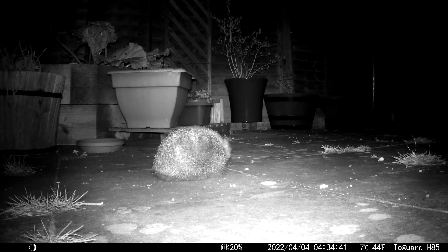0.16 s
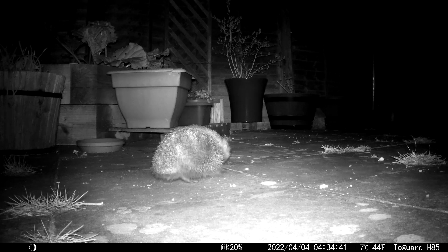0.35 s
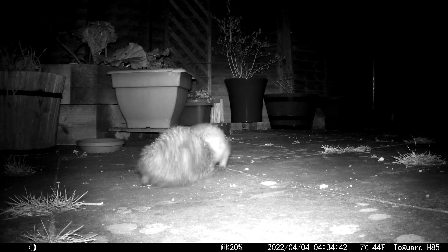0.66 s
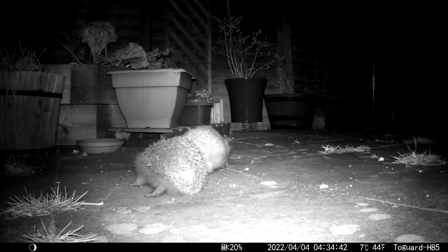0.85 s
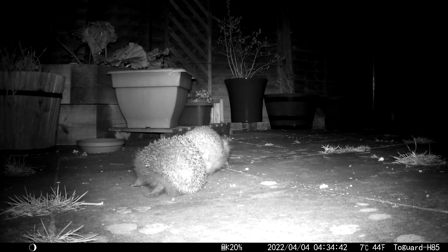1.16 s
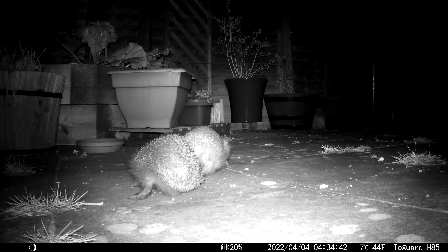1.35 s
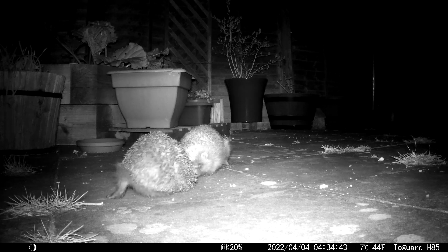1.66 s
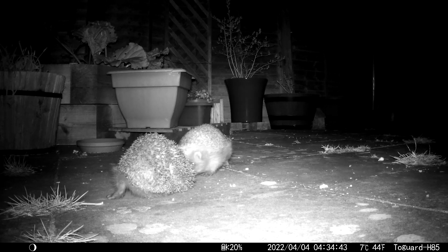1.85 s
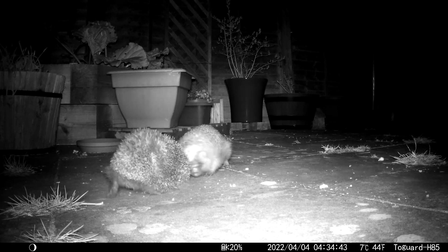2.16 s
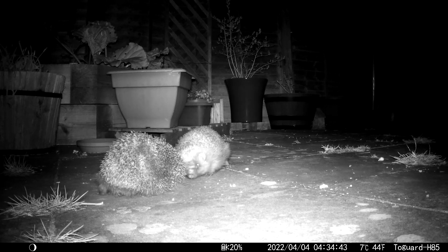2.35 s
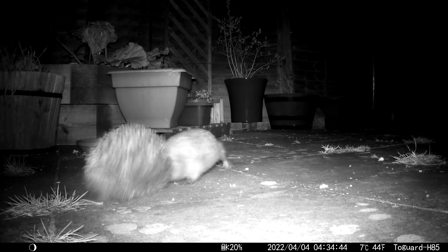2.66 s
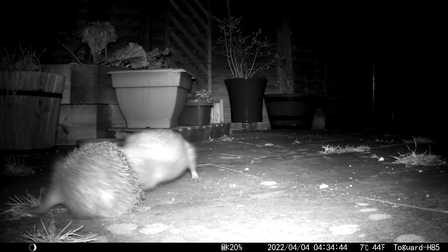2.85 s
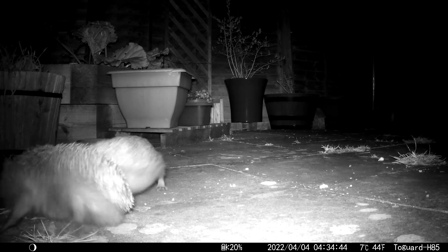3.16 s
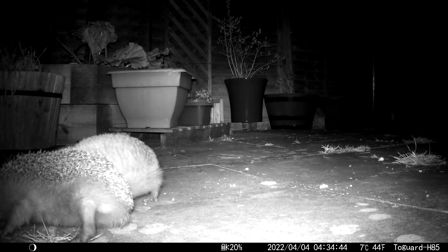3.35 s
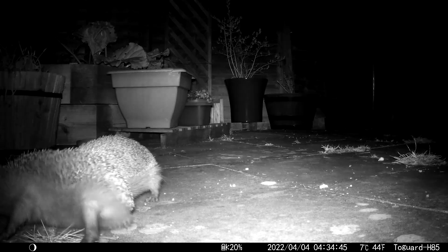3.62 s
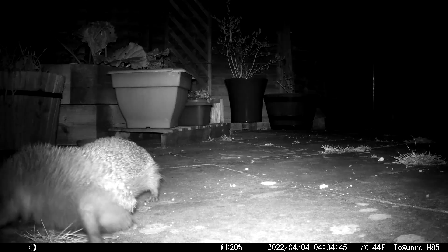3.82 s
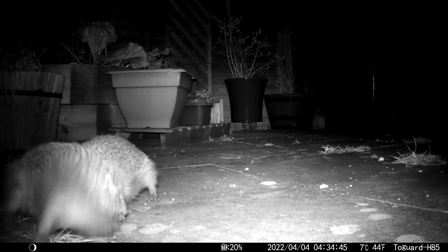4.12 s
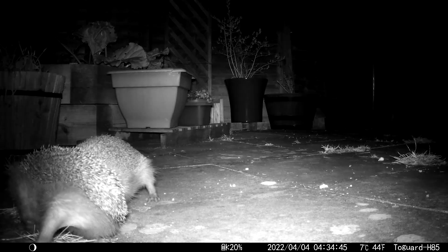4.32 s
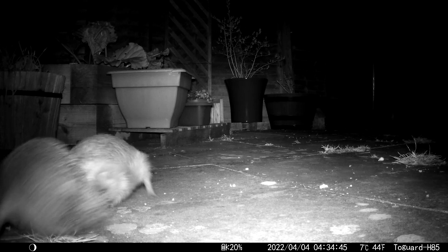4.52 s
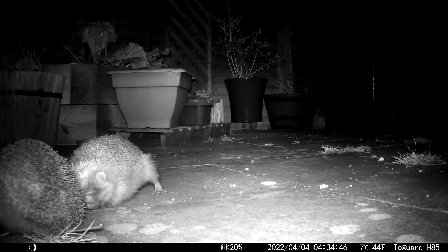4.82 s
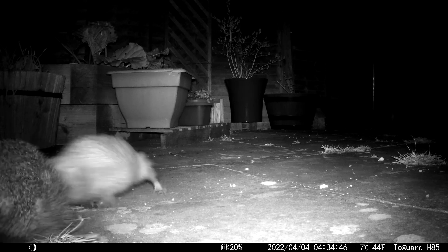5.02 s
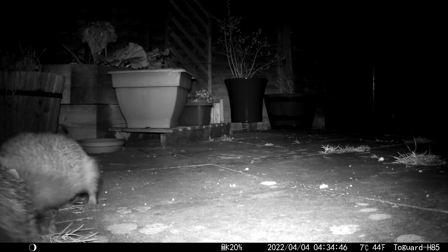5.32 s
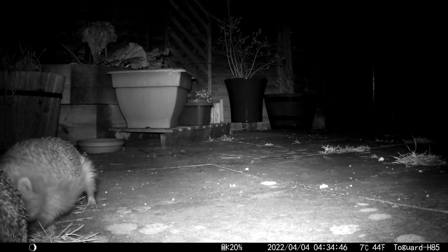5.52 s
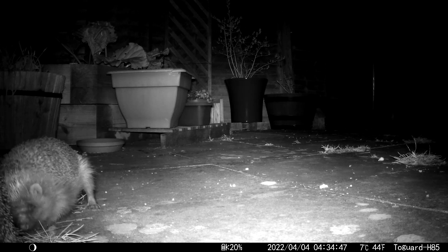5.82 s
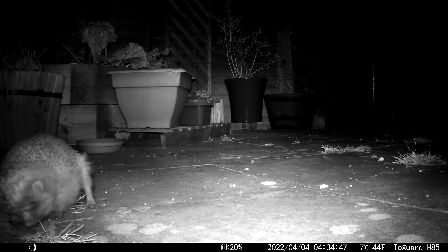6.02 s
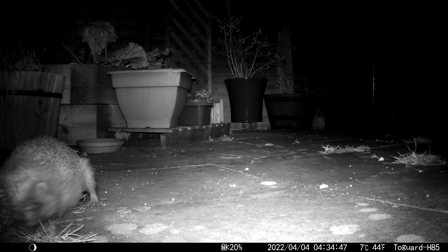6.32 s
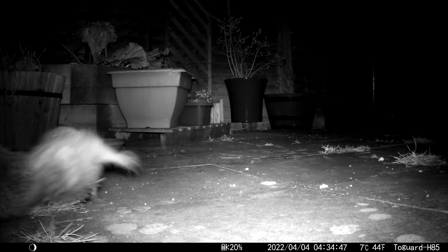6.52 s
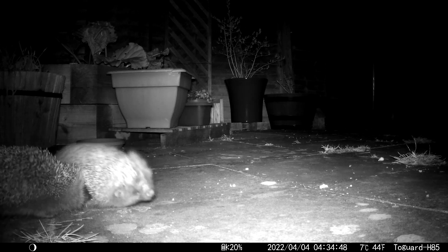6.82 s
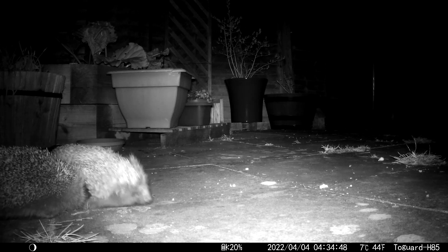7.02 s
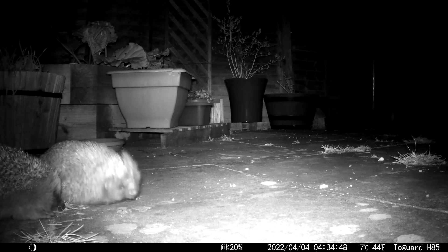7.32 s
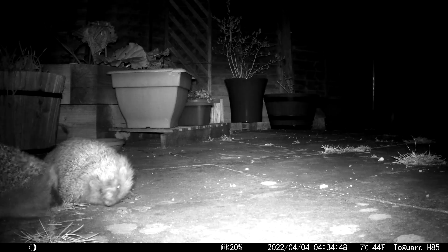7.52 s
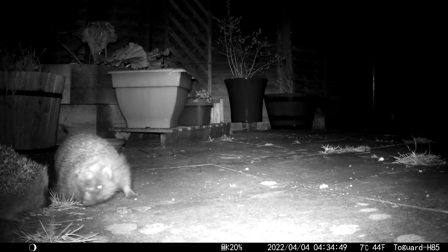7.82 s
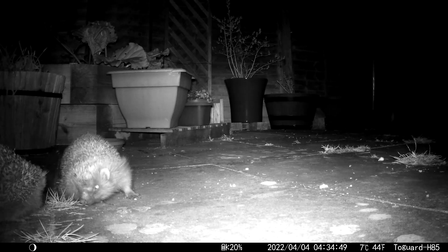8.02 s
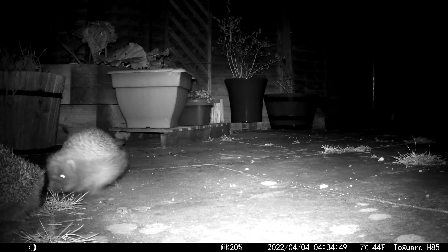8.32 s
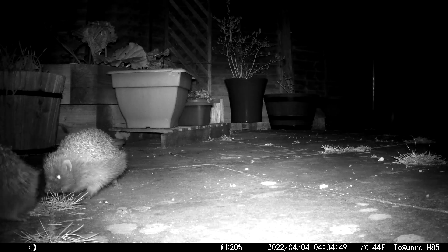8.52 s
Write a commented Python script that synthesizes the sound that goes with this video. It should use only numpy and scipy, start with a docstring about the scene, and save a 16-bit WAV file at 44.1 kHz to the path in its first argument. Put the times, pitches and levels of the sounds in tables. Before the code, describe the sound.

Sharp, breathy hedgehog snorts repeat close by, with spines scraping and claws ticking on paving above a faint wavering hum.

```python
"""Two hedgehogs snort and scuffle on a paved patio at night, close to a small outdoor microphone.
Turbulent breath rings in the nose; spines and feet scrape the stone; claws tick, with a few dull knocks.
Air buffets the microphone in lumps and short puffs.
Behind them: a wavering hum, far rumble and the recorder's hiss."""
import sys
import numpy as np
from scipy import signal
from scipy.fft import rfft, irfft, next_fast_len
from scipy.io import wavfile

SR = 44100
rng = np.random.default_rng(int(sys.argv[2]) if len(sys.argv) > 2 else 0)


def store_pcm(level_fs):
    """Save levels as 16-bit WAV."""
    pcm = np.round(np.clip(level_fs, -1, 1) * 32767).astype(np.int16)
    wavfile.write(sys.argv[1], SR, np.atleast_2d(pcm).T)


N = 382347


def from_db(db):
    """Decibels to gain."""
    return 10 ** (np.asarray(db) / 20)


def rms_one(x):
    """Scale to unit rms."""
    return x / np.sqrt(np.mean(x ** 2) + 1e-20)


def in_time(rows):
    """Interpolate (t/s, value) rows to one value a sample."""
    return np.interp(np.arange(N) / SR, *np.transpose(rows))


def after(start_s, span_s):
    """Sample indices of a span, and their age in s."""
    at = np.arange(max(int(start_s * SR), 0), min(int((start_s + span_s) * SR), N))
    return at, at / SR - start_s


def drift(rate_hz):
    """Low-passed random wander, rms 1."""
    r = np.exp(-2 * np.pi * rate_hz / SR)
    return rms_one(signal.lfilter([1], [1, -2 * r, r * r], rng.standard_normal(N + SR))[SR:])


def resonate(x, modes):
    """Parallel resonances of alternating sign, each applied twice for deep valleys."""
    out = 0
    for k, (hz, width_hz, level_db) in enumerate(modes):
        r = np.exp(-np.pi * width_hz / SR)
        b = (1 - r * r) / 2 * np.array([1, 0, -1])
        a = [1, -2 * r * np.cos(2 * np.pi * hz / SR), r * r]
        out = out + (-1) ** k * from_db(level_db) * signal.lfilter(b, a, signal.lfilter(b, a, x))
    return out


def colour(x, spectrum):
    """Shape noise by (f/Hz, gain/dB) rows; rms 1."""
    hz, gain_db = np.transpose(spectrum)
    size = next_fast_len(N)
    log_hz = np.log(np.arange(size // 2 + 1) * SR / size + 1e-3)
    gain = from_db(np.interp(log_hz, np.log(hz), gain_db))
    return rms_one(irfft(rfft(x, size) * gain, size)[:N])


def bursts(rows, t60_s, size=6000):
    """One decaying band of noise per (t/s, peak/dB, f/Hz) contact."""
    out, age_s = np.zeros(N + size), np.arange(size) / SR
    for start_s, peak_db, hz in rows:
        noise = rng.standard_normal(size) * from_db(-60 * age_s / t60_s)
        burst = resonate(noise, [(hz, 0.95 * hz, 0)])
        first = int(start_s * SR)
        out[first:first + size] += from_db(peak_db) * burst / np.abs(burst).max()
    return out[:N]


def snorts(air_top_hz=13100, roundness=1.4, tail_t60_s=0.37, whistle_width_hz=800, glide=0.04):
    """Turbulent air, fluttering as wet nostrils flap, rings in the nose; flow swells, drops, trails off."""
    # Snorts, coloured by snout direction: t/s, rise/s, fall/s, level/dB, relative tail/dB, whistle/Hz,
    # then gain/dB of whistle, upper whistle, throat, palate, nostril, top hiss
    breaths = [(-0.006, 0.0085, 0.11, -42, -3, 5200, 9, -3, 7.5, 8, 0.5, -8),
               (0.359, 0.065, 0.053, -47, -5, 4860, 1, -1, -1, 6, -2, -4),
               (0.611, 0.062, 0.054, -44.3, -6.5, 4450, -1, -8, 2.5, -7, -7.5, 3),
               (1.274, 0.049, 0.06, -34.5, -17, 4700, 2.5, -10, 2, -1.5, 1, 5),
               (1.555, 0.064, 0.078, -38, -7, 4630, -5, -8, 0, 0, -5.5, 0),
               (2.018, 0.05, 0.053, -40, -6, 4740, 1, -3, 2, -0.5, -6.5, -4),
               (2.261, 0.059, 0.055, -44.5, -30, 5560, 4, -4, 3.5, 2, -3, -5),
               (2.571, 0.058, 0.068, -34, -1.5, 5070, 3, -10, -0.5, -3.5, -7.5, 0),
               (2.816, 0.129, 0.033, -34, -7, 6200, 8, -6, -3, -3.5, 2.5, 2),
               (3.266, 0.094, 0.022, -31.5, -17.5, 6201, 0, -11, 2, -2, 3.5, 14.5),
               (3.564, 0.086, 0.067, -25, -17, 5740, -3, -8, 0, -1, -1, 2),
               (3.834, 0.058, 0.066, -32.5, -2, 4470, -2.5, -13, 2, -1, -2.5, 1),
               (4.121, 0.062, 0.0093, -35, 3, 4700, 0, -6, 3, 2, -1, 2),
               (4.482, 0.14, 0.026, -27, -10, 4870, -4, -9, 0.5, 0, -6, 7.5),
               (4.95, 0.081, 0.047, -31.5, -14, 4823, -6, -7, -1, 1.5, -8.5, 0),
               (5.631, 0.093, 0.055, -30.5, -6.5, 4870, -10, -19, 1, -1.5, -3.5, 2.5),
               (5.965, 0.093, 0.074, -32.5, -0.5, 4700, -8, -8, 0.5, -2.5, -4.5, 5),
               (6.372, 0.048, 0.048, -44, 0, 5070, -14, -5, -2, 4, -7, 0),
               (6.663, 0.058, 0.0085, -30.5, -26, 6029, -1, -6, 3.5, -2, 2, 15),
               (7.203, 0.077, 0.029, -41, -6.5, 5940, -3, -8, 5.5, -2, -1, 4),
               (7.642, 0.053, 0.044, -42.5, -3, 5040, -8, 1, 1.5, -2, -5, -8),
               (8.058, 0.073, 0.035, -35, -13, 4830, -1, -3, -1.5, -3.5, -2.5, -10),
               (8.566, 0.076, 0.052, -34.5, 1, 5130, 0.5, -7, -2, -4, -5.5, -8)]
    # Airway resonances: f/Hz, width/Hz, gain/dB
    nose_modes = [(3250, 800, -6), (4800, 1700, -3)]
    upper_whistle = [(7500, 1100, 0)]
    throat = [(673, 550, -5)]
    palate = [(1750, 500, -5)]
    nostril = [(7700, 4450, -1.15)]
    top_hiss = [(10750, 5800, -16)]

    flutter = from_db(1.3 * drift(30) + 1.8 * drift(570))
    lowpass = signal.butter(10, air_top_hz, fs=SR, output="sos")
    air, spray = signal.sosfilt(lowpass, rng.standard_normal((2, N)) * flutter)
    nose = resonate(air, nose_modes)
    bands = np.array([resonate(spray, upper_whistle), resonate(air, throat), -resonate(air, palate),
                      resonate(air, nostril), resonate(spray, top_hiss)])
    out = np.zeros(N)
    for start_s, rise_s, fall_s, level_db, tail_db, whistle_hz, whistle_db, *bands_db in breaths:
        at, age_s = after(start_s, rise_s + fall_s + tail_t60_s)
        up = np.clip(age_s / rise_s, 0, 1)
        down = np.clip((age_s - rise_s) / fall_s, 0, 1)
        progress = (up + down) / 2
        push = np.abs(np.sin(np.pi * progress)) ** roundness
        tail = up * from_db(tail_db - 60 * np.maximum(age_s - rise_s, 0) / tail_t60_s)
        # The whistle rises: crossfade from below its pitch to above.
        low, high = (resonate(spray[at], [(whistle_hz * ratio, whistle_width_hz, whistle_db)])
                     for ratio in (1 - glide, 1 + glide))
        whistle = np.sqrt(1 - progress) * low + np.sqrt(progress) * high
        jet = nose[at] + whistle + from_db(bands_db) @ bands[:, at]
        out[at] += from_db(level_db) * np.hypot(push, tail) * rms_one(jet)
    return out


def hum(centre_hz=88.8):
    """One low tone, wavering in pitch and level."""
    # Hum contour: t/s, level/dB
    contour = [(0, -49.5), (0.45, -47.5), (0.55, -55), (1.05, -48.5), (1.85, -61), (2.05, -52), (2.35, -66),
               (2.46, -49), (3.65, -50), (3.78, -61), (4.2, -44.5), (5.25, -51), (5.42, -61), (5.65, -48),
               (6.05, -49.5), (6.13, -69), (6.6, -48.5), (7.45, -57), (7.75, -48), (8.0, -59.5),
               (8.67, -50.5)]
    level_db = in_time(contour) + 3.6 * drift(1)
    pitch_hz = centre_hz + 1.24 * drift(6.15)
    return np.sqrt(2) * from_db(level_db) * np.sin(2 * np.pi * np.cumsum(pitch_hz) / SR)


def buffet(low_hz=(18, 70), high_hz=(110, 220)):
    """Lumpy air pressure on the microphone, strongest below the hum."""
    # Pressure contour: t/s, level/dB
    contour = [(0, -60), (2.5, -61.5), (3.8, -53.5), (4.2, -46.5), (4.5, -44.5), (4.85, -49), (5.1, -51.5),
               (5.6, -54.5), (6.0, -53.5), (6.7, -55.5), (7.4, -58), (8.67, -62)]
    lumps = rng.standard_normal(N) * from_db(1.8 * drift(23))
    low, high = (signal.sosfilt(signal.butter(2, band_hz, "band", fs=SR, output="sos"), lumps)
                 for band_hz in (low_hz, high_hz))
    return from_db(in_time(contour)) * rms_one(low + from_db(-9.5) * high)


def rumble_and_hiss(level_db=-50):
    """Steady far rumble and recorder hiss."""
    # Noise spectrum: f/Hz, gain/dB
    spectrum = [(59, -36), (100, -8.5), (118, -11), (149, -14.5), (358, -19), (390, -17), (480, -22.5),
                (828, -22.5), (2260, -37), (2560, -35), (14000, -36.5), (14900, -32.5)]
    return from_db(level_db) * colour(rng.standard_normal(N), spectrum)


def knocks():
    """Dull contacts, lower and longer than the claw ticks."""
    # Knocks: t/s, peak/dB, f/Hz
    contacts = [(0.621, -42, 654), (4.779, -28, 1570), (4.788, -45.5, 2180), (6.974, -46, 608)]
    return bursts(contacts, t60_s=0.16)


def scrapes(contacts_per_s=9000, attack_s=0.043, t60_s=0.41):
    """Spines and feet drag over stone: tiny contacts of uneven size, in clumps."""
    # Drags: t/s, length/s, level/dB, change over the drag/dB, brightness/dB
    drags = [(0.707, 0.11, -44, -3.5, -8.5), (2.7, 0.27, -46, -5, -2), (2.973, 0.18, -54.5, 9.5, -2),
             (3.176, 0.13, -44.5, -0.5, 0), (4.628, .06, -47.5, -0.5, -3), (5.057, 0.27, -42, -4.5, -2.5),
             (5.414, 0.034, -47, -4, 1), (6.432, 0.096, -49.5, -0.5, 4.5), (6.526, 0.086, -45, -11.5, -4),
             (6.62, 0.033, -48, -6, -3), (6.709, 0.098, -44.5, -10, 3.5), (6.773, 0.019, -46.5, -4.5, -4),
             (6.926, 0.048, -58.5, -1, -15), (7.732, 0.07, -53, -2.5, -12)]
    # Scrape spectra: f/Hz, gain/dB
    body_spectrum = [(260, 3), (450, -6.5), (655, 4.5), (1150, -6), (1660, -12), (2130, -16), (5880, 4),
                     (9000, -6.5), (11700, -50), (19800, -120)]
    top_spectrum = [(6000, -9), (8500, -6.5), (11000, -1.5), (15000, -26)]

    sizes = from_db(1.7 * np.minimum(rng.exponential(1, N), 6)) * rng.choice([-1, 1], N)
    hits = rng.random(N) < contacts_per_s * from_db(3 * drift(40)) / SR
    grit = sizes * hits
    unevenness = from_db(2.2 * drift(10.4))
    body, top = colour(grit, body_spectrum), colour(grit, top_spectrum)
    out = np.zeros(N)
    for start_s, length_s, level_db, change_db, bright_db in drags:
        at, age_s = after(start_s, length_s + t60_s)
        drag_db = level_db + change_db * np.minimum(age_s / length_s, 1)
        release_db = -60 * np.maximum(age_s - length_s, 0) / t60_s
        gain = np.minimum(age_s / attack_s, 1) * from_db(drag_db + release_db)
        out[at] += gain * (body[at] + from_db(bright_db) * top[at]) * unevenness[at]
    return out


def claw_ticks(centre_hz=6500, spread=0.1):
    """Claws strike the paving, each a little off the common pitch."""
    # Claw strikes: t/s, peak/dB
    strikes = [(0.734, -32), (0.794, -40), (3.068, -27), (3.204, -22), (3.241, -27), (3.343, -15),
               (4.632, -23), (4.651, -28), (5.401, -33.5), (5.454, -28), (6.519, -26), (6.564, -25),
               (6.622, -30), (6.831, -25), (6.929, -38), (6.952, -33), (7.765, -37), (7.792, -30)]
    pitch_hz = centre_hz * (1 + spread * rng.uniform(-1, 1, len(strikes)))
    return bursts(np.column_stack([strikes, pitch_hz]), t60_s=0.028)


def puffs(cycles=1.58, size=4000):
    """Each eddy pushes the microphone membrane briefly to and fro."""
    # Eddies: t/s, envelope peak/dB, f/Hz
    eddies = [(4.149, -26.5, 85.6), (4.209, -48, 94.2), (4.273, -30, 91), (4.293, -16, 257),
              (4.303, -21, 217), (4.31, -18.5, 120), (4.323, -17, 190), (4.337, -18, 188),
              (4.349, -12.5, 259), (4.421, -41, 58.4), (4.731, -30.5, 37.2), (4.748, -34, 61.5),
              (4.888, -35, 68), (5.489, -39, 45.8), (5.6, -36.5, 37.7), (5.664, -28, 76),
              (6.59, -34.5, 77.7)]
    out, age_s = np.zeros(N), np.arange(size) / SR
    for start_s, peak_db, hz in eddies:
        swell = np.sin(np.pi * np.minimum(age_s * hz / cycles, 1)) ** 2
        swing = np.sin(2 * np.pi * hz * age_s + rng.uniform(0, 2 * np.pi))
        first = int(start_s * SR)
        out[first:first + size] += from_db(peak_db) * swell * swing
    return out


def scene():
    """Hedgehogs, air on the microphone and night background, in mono."""
    mix = snorts() + hum() + buffet() + rumble_and_hiss() + knocks() + scrapes() + claw_ticks() + puffs()
    return mix[None]


def record(dry):
    """Steep low-pass, 70 dB down from 15 kHz."""
    return signal.sosfilt(signal.cheby2(20, 70, 15000, fs=SR, output="sos"), dry)


dry = scene()
out = record(dry)
store_pcm(out)
```